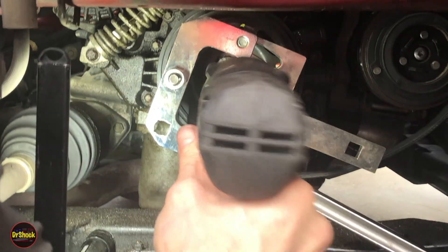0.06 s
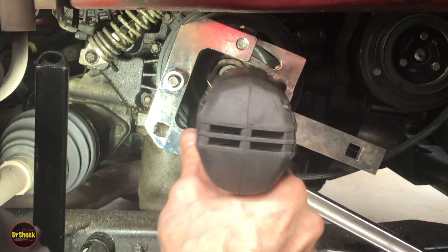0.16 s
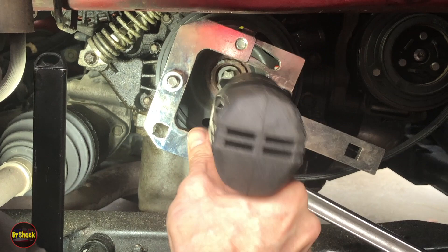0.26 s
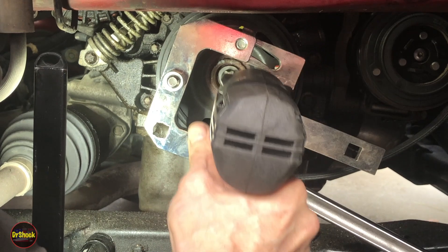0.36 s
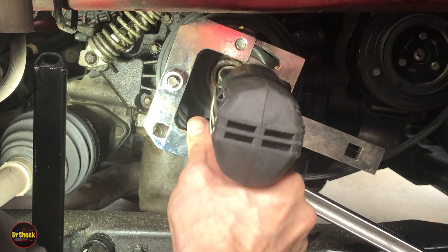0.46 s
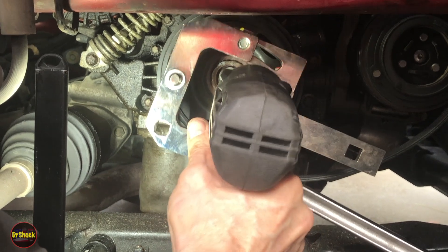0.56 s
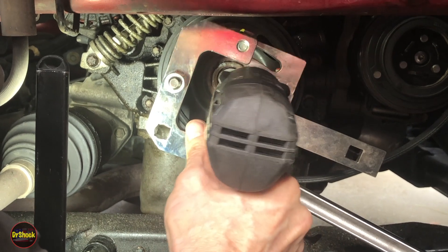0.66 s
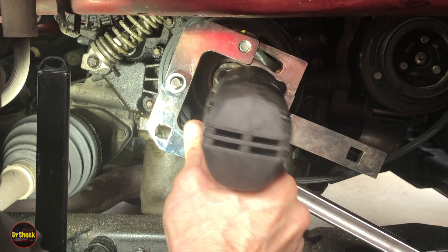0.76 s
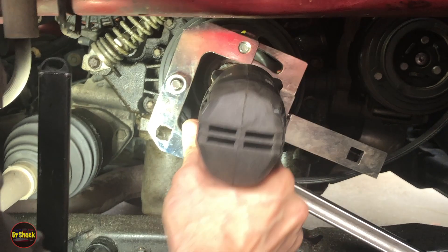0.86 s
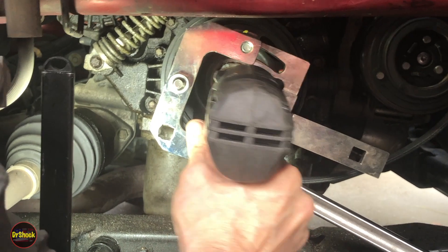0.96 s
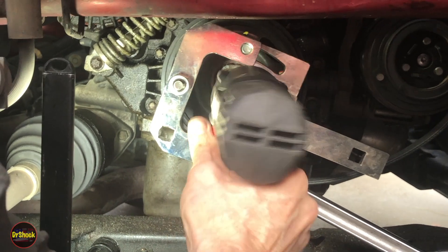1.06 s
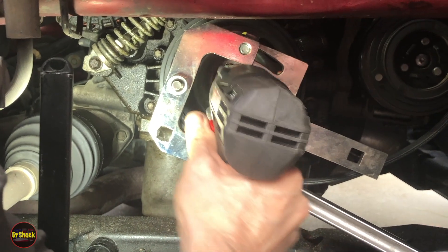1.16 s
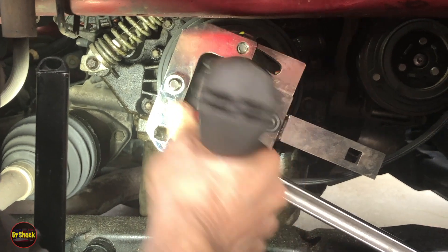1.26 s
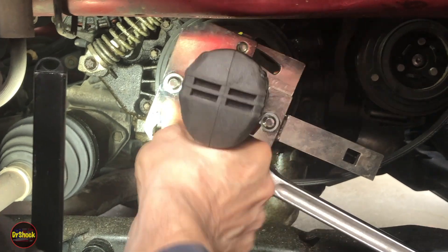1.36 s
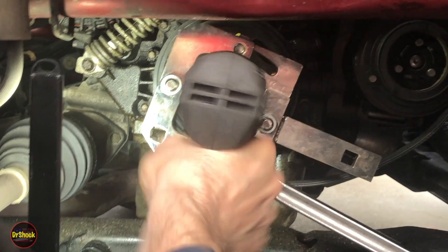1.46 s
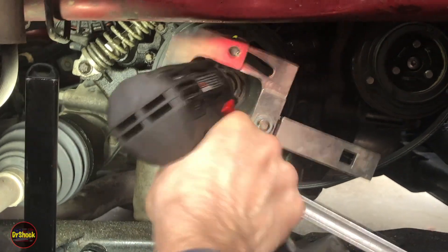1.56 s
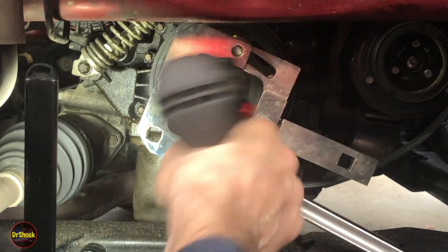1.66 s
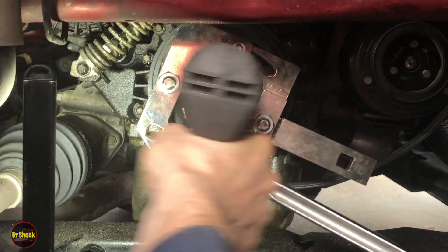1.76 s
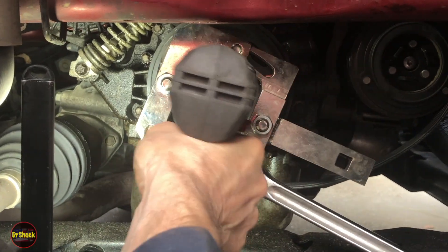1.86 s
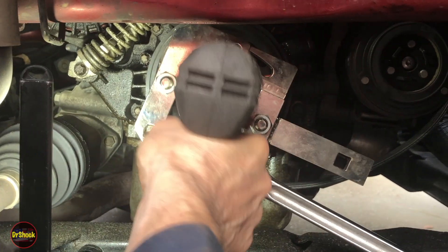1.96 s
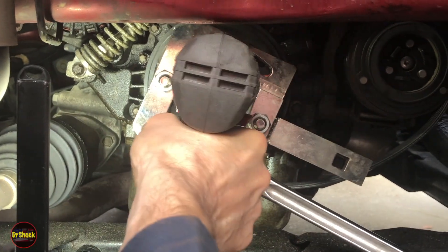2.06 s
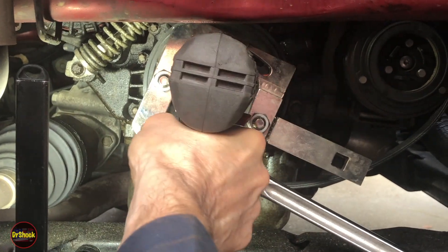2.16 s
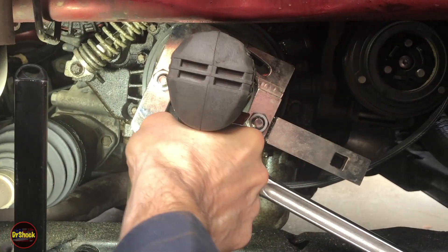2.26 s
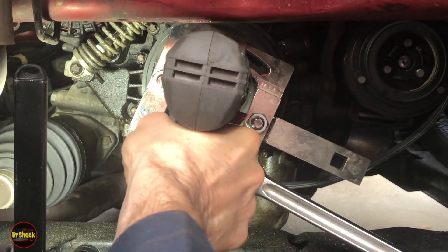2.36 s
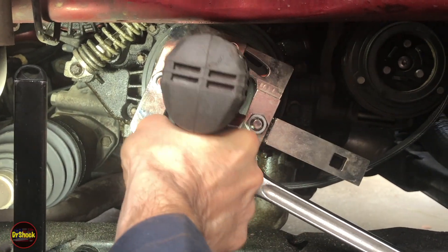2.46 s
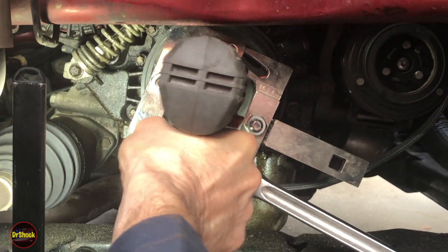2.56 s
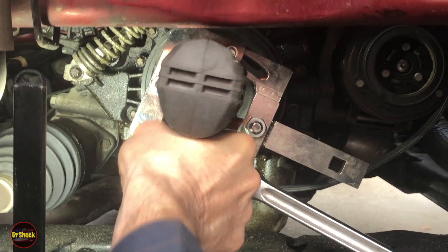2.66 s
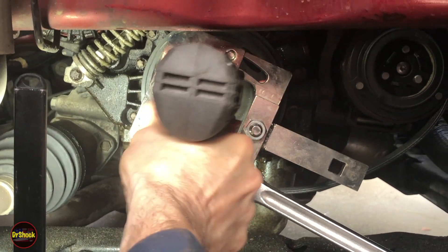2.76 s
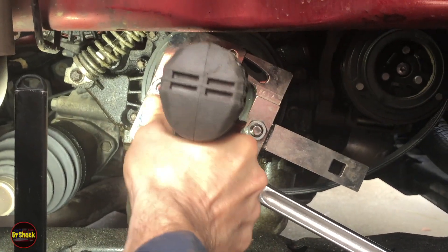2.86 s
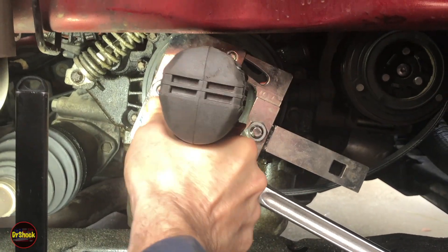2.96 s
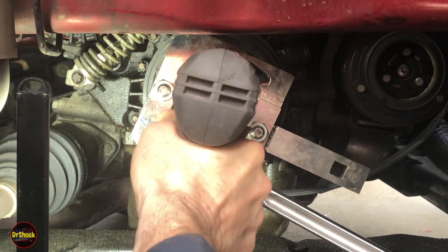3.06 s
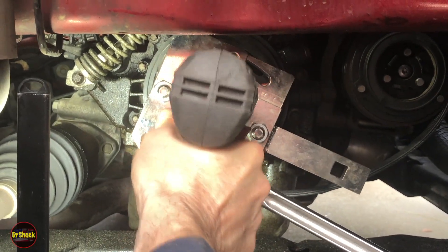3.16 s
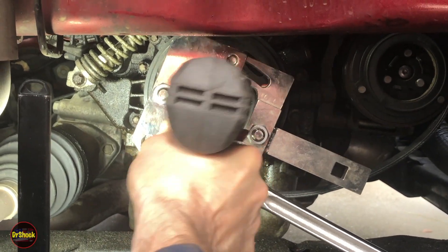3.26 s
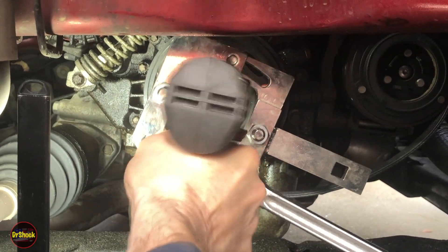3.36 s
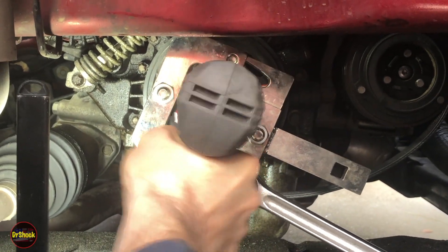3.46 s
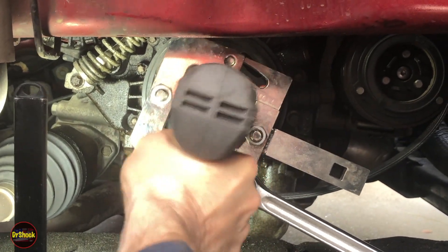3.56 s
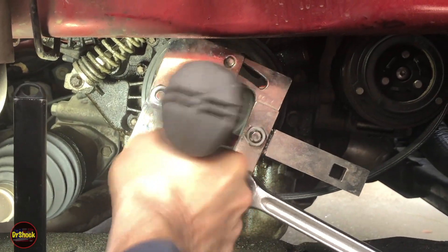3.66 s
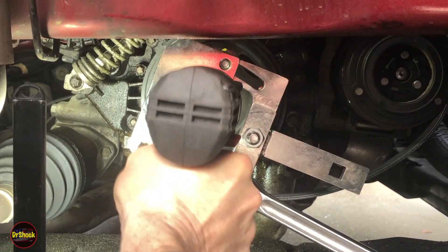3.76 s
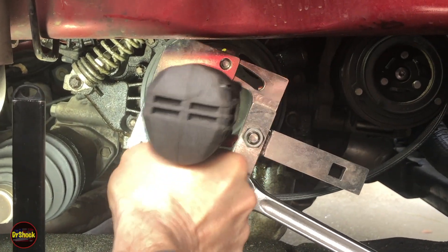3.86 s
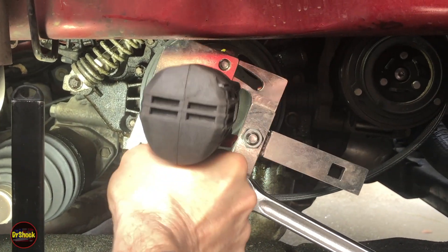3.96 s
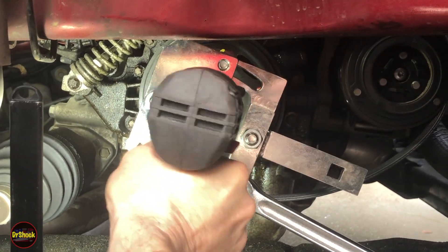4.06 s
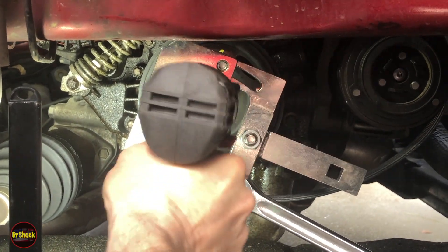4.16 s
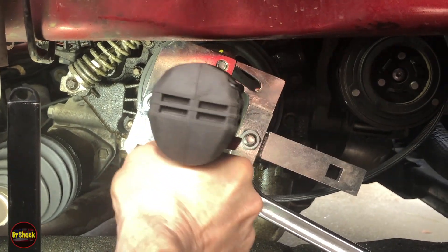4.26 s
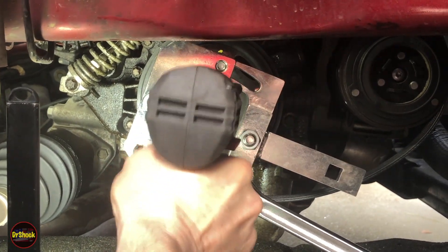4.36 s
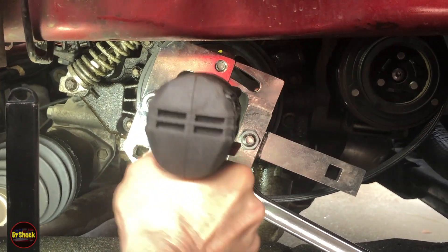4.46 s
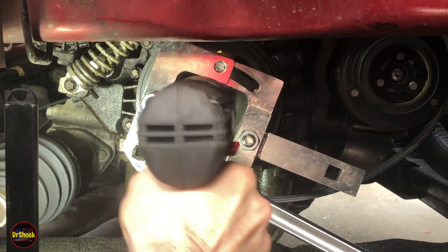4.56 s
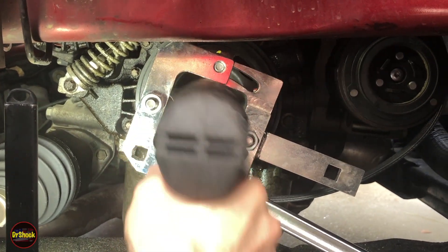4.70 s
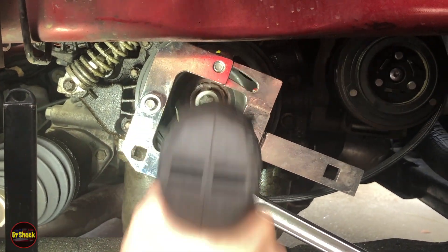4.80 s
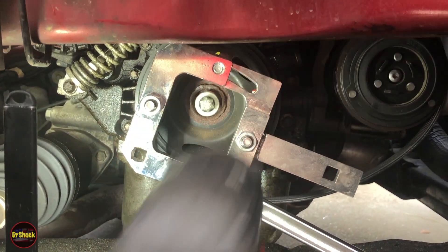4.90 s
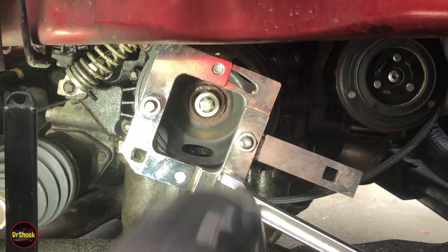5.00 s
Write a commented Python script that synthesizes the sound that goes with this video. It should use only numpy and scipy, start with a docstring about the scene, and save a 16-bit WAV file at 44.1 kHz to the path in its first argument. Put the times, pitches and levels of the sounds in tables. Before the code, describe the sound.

A close perspective in a quiet garage with soft steady air, short reflections from nearby metal and a faint room tail. From 0 to 0.7 s there is light rustling and a few faint socket taps. A sharp metal clack lands at 0.95 s, smaller knocks follow to 1.3 s, and a loud, dense clatter with dull ringing comes around 1.6 to 1.75 s. Then only faint ticks and handling, with a barely audible high electronic whistle near 2.55 s. At about 3.35 s a cordless impact wrench starts: from 3.4 to 3.65 s a dozen loud, rapid blows ring through steel. The bolt loosens, and the whine climbs over rattling gears until a sharp braking fall at 3.87 s with a faint clash. A second whirring pull runs from 4.0 to 4.5 s, rising quickly, holding, then braking with a bright clash. Soft rustling ends it at 5 s.

```python
"""A cordless impact wrench runs a bolt out of an engine, heard from close by in a garage.
The socket knocks and rustles about until it seats; each contact is a noise burst with a metal ring.
Twelve hammer blows, noise bursts ringing through steel, break the bolt loose. In two pulls of the
trigger the motor spins it out: sine tones make the whine, filtered noise the rattling gears.
A faint drive whistle, a clash near each release and quiet, steady air complete the scene."""
import sys
import numpy as np
from scipy import signal
from scipy.fft import rfft, irfft
from scipy.io import wavfile

SR = 44100
rng = np.random.default_rng(int(sys.argv[2]) if len(sys.argv) > 2 else 0)


def int16_out(signal):
    """Quantize to a 16-bit WAV file."""
    q = np.round(np.clip(np.atleast_2d(signal).T, -1, 1) * 32767)
    wavfile.write(sys.argv[1], SR, q.astype(np.int16))


N = 221965
TIME = np.arange(N) / SR  # seconds

# Socket and tool knocking on bolt and bracket. Each row: start in seconds, base level in dB,
# hardness in dB, centre of the ring in Hz, base level of the ring in dB against the knock.
KNOCKS = [(0.3073, -43, 1, 2140, -20), (0.362, -55, 3, 2230, -12), (0.5535, -56.5, -8, 1920, -2),
          (0.6488, -53, -3, 2210, -14), (0.95, -22, -1.5, 2650, -6.5), (1.1061, -37, 6.5, 1670, -7),
          (1.1484, -34, -5.5, 1640, -13), (1.1536, -27.5, 3.5, 1700, -11), (1.1798, -41, -12, 2360, -10),
          (1.1959, -32.5, -3, 1560, -12.5), (1.3122, -44.5, -11, 1170, -3), (1.5835, -30.5, 4, 1500, -3.5),
          (1.5896, -19.5, 2, 2560, -10), (1.6072, -13, -0.5, 1230, -7.5), (1.6304, -30, -1, 1040, -9),
          (1.664, -25.5, -0.5, 1250, -10), (1.712, -24.5, -2, 1490, -5.5), (1.7465, -40.5, -11, 1530, -4),
          (1.8232, -52, 1, 1790, -9), (1.993, -62, -23, 1042, -9), (2.2339, -56, -11, 1010, -8),
          (2.325, -62, -15, 1010, -1), (2.478, -54.5, 5, 1750, -8), (2.5261, -43.5, 11, 1530, -11),
          (2.649, -57.5, 3, 3900, -4), (2.7202, -49.5, 5, 1790, -8), (2.8282, -43, 6, 1410, -2),
          (2.8741, -51.5, 1, 1540, 1), (2.974, -53.5, 4, 2650, -12), (3.0837, -39.5, 17, 3190, -8),
          (3.3375, -50.5, -2, 4160, -1), (3.357, -52, 2, 4950, 2)]
# A light touch on the trigger first takes up the slack: start and end in seconds, whine pitch in Hz.
CREEP_START_S, CREEP_END_S, CREEP_HZ = 3.328, 3.39, 1950
BOLT_FREE_S = 3.672  # moment the bolt comes loose
BRAKE_S = 0.095  # from release to standstill
EASE_S = 0.02  # how gradually the finger and the brake act


def from_db(db):
    """Turn decibels into an amplitude factor."""
    return 10 ** (np.asarray(db) / 20)


def rms_one(x):
    """Scale a signal to an average (RMS) level of one."""
    return x / np.sqrt(np.mean(x ** 2) + 1e-20)


def noise():
    """White noise as long as the scene."""
    return rng.standard_normal(N)


def band(x, hz, kind, order=2):
    """Keep the low, high or middle part of the spectrum."""
    return signal.sosfilt(signal.butter(order, hz, kind, fs=SR, output="sos"), x)


def drift(hz):
    """Random wander of spread 1, mostly slower than the given rate."""
    return rms_one(band(noise(), hz, "low"))


def coloured(x, spectrum, size=8192):
    """Filter to the given spectrum without sounding early (minimum phase); white noise keeps its power."""
    hz, db = np.transpose(spectrum)
    bin_hz = np.arange(size // 2 + 1) * SR / size
    gain = from_db(np.interp(np.log(bin_hz + 1), np.log(hz), db))
    # Folding the cepstrum puts the filter's energy as early as possible.
    cepstrum = irfft(np.log(rms_one(gain)))
    cepstrum[1:size // 2] *= 2
    cepstrum[size // 2 + 1:] = 0
    impulse = irfft(np.exp(rfft(cepstrum)))
    return signal.fftconvolve(x, impulse)[:N]


def steel(x, width_hz):
    """The steel parts ring in parallel; the tighter they are held, the wider their modes."""
    # Ring of socket, bolt and bracket. Each row: pitch in Hz, relative level in dB.
    steel_modes = [(1499, 2.5), (1604, -2), (1784, 4.5), (1951, -2), (2368, 1.5), (2629, -1), (2847, 6),
                   (2998, -7), (3081, -5), (3186, -10), (3278, -6.5), (3442, -11.5), (3644, -2),
                   (3752, -6.5), (4190, -8.5), (4403, -9.5), (4551, -5.5), (5477, -5)]
    out = np.zeros(N)
    r = np.exp(-np.pi * width_hz / SR)  # a wider mode dies away faster
    for k, (hz, db) in enumerate(steel_modes):
        feedback = [1, -2 * r * np.cos(2 * np.pi * hz / SR), r * r]
        ring = signal.lfilter([1 - r, 0, r - 1], feedback, x)
        out += (-1) ** k * from_db(db) * ring
    return out


def bursts(times, levels_db, t60, tail_db, tail_t60):
    """Each contact is a crack that scatters through the metal; t60 is the seconds it takes to fall 60 dB."""
    power = np.zeros(N)
    power[np.round(np.asarray(times) * SR).astype(int)] = from_db(levels_db) ** 2

    def fading(seconds):
        """Power dying away steadily after each contact."""
        kept_per_sample = from_db(-60 / (seconds * SR)) ** 2
        return signal.lfilter([1], [1, -kept_per_sample], power + 1e-18)

    return noise() * np.sqrt(fading(t60) + from_db(tail_db) ** 2 * fading(tail_t60))


def still_air():
    """The still air of the garage: steady coloured noise."""
    # Each row: frequency in Hz, relative level per hertz in dB.
    air_colour = [(12, -43), (20, -10), (74, -3), (137, -4.5), (317, -20.5), (524, -21), (843, -22.5),
                  (996, -28.5), (1690, -31), (1950, -38), (3040, -34), (3400, -36), (15800, -45.5)]
    return from_db(-61) * coloured(noise(), air_colour)


def rustle():
    """Hand, sleeve and socket slide as the tool is brought up and drawn away; each move swells and fades."""
    # Each row: frequency in Hz, relative level per hertz in dB.
    rustle_colour = [(120, -36.5), (200, 3.5), (268, -1), (537, -5.5), (848, -12), (1790, -10.5),
                     (5370, -21), (11200, -28), (15800, -31)]
    # Each row: middle in seconds, half-length in seconds, base level in dB, adjustment of the hiss in dB.
    moves = [(0.01, 0.05, -68.5, 9), (0.22, 0.16, -67.5, 0.5), (0.96, 0.089, -62.5, -22),
             (1.416, 0.056, -65, 1), (1.64, 0.13, -52, -14), (2.062, 0.089, -73, -1),
             (2.524, 0.04, -70, 4.5), (2.754, 0.044, -66.5, -7), (3.36, 0.06, -62.5, -21),
             (4.976, 0.16, -58, -12)]
    grain = coloured(noise() * from_db(2.4 * drift(60)), rustle_colour)
    low = band(grain, [250, 5000], "band")
    high = from_db(10.5) * band(grain, 4000, "high", order=1)
    out = np.zeros(N)
    for s, half, db, hiss_db in moves:
        swell = np.exp(-((TIME - s) / half) ** 2)
        out += from_db(db) * swell * (low + from_db(hiss_db) * high)
    return out


def knocks():
    """Light metal contacts: a rattling clack, a longer thud of the bracket, a short bright tick and a clink."""
    # Each row: frequency in Hz, relative level per hertz in dB.
    knock_colour = [(59, -31.5), (100, -10.5), (396, -12), (511, -0.5), (717, -11.5), (868, -8),
                    (1410, -13), (1540, -6), (1940, -6), (7370, -23), (9300, -23.5), (15800, -34)]
    thud_base_db, tick_base_db = -18, -19.5  # against the clack, before the mix below
    s, db, hard_db = np.vstack([[row[:3] for row in KNOCKS], fidgets()]).T
    # A harder contact has more tick and less thud.
    contacts = np.column_stack([s, db, db + thud_base_db - hard_db, db + tick_base_db + hard_db])
    s, db, thud_db, tick_db = bouncing(contacts, bounce_db=-7.5, spread=0.006).T
    clack = bursts(s, db, t60=0.027, tail_db=-14.0, tail_t60=0.1) * from_db(0.42 * drift(340))
    thud = bursts(s, thud_db, t60=0.074, tail_db=-10.5, tail_t60=0.19)
    tick = bursts(s, tick_db, t60=0.037, tail_db=-18.5, tail_t60=0.07)
    contact = from_db(-5.5) * band(clack, [800, 7000], "band")
    contact += from_db(7.5) * band(thud, 700, "low")
    contact += from_db(12.0) * band(tick, 3700, "high")
    ring = from_db(-12.5) * steel(clack, width_hz=45)
    return coloured(contact, knock_colour) + ring + clinks(t60=0.036, breadth=0.22)


def fidgets(count=40):
    """Faint touches at random while the socket hunts for the bolt, until the motor starts."""
    per_second, middle_db, spread_db = 2.3, -64.5, 3.5
    wait, size, hardness = rng.random((count, 3)).T
    s = np.cumsum(-np.log(1 - wait) / per_second)  # random waits between touches
    level_db = middle_db + spread_db * (2 * size - 1)
    hard_db = 6 * (2 * hardness - 1)
    return np.column_stack([s, level_db, hard_db])[s < CREEP_START_S]


def bouncing(rows, bounce_db, spread, count=2):
    """Loose parts touch again, more weakly, just after each contact."""
    rows = np.array(rows, float)
    gaps = 0.0014 + spread * rng.random((len(rows), count))  # seconds
    delays = gaps.cumsum(axis=1)
    touches = [rows]
    for k in range(count):
        touches.append(np.column_stack([rows[:, 0] + delays[:, k], rows[:, 1:] + (k + 1) * bounce_db]))
    return np.vstack(touches)


def clinks(t60, breadth):
    """Each listed knock favours a cluster of modes around a pitch of its own."""
    out = np.zeros(N)
    age = TIME[:SR // 8]  # seconds since the contact
    ratio = 1 + breadth
    for s, db, _, hz, ring_db in KNOCKS:
        at = round(s * SR)
        cluster = rms_one(band(rng.standard_normal(len(age)), [hz / ratio, hz * ratio], "band"))
        out[at:at + len(age)] += from_db(db + ring_db - 60 * age / t60) * cluster
    return out


def whistle():
    """With the trigger barely pressed, the windings sing at the drive's switching rate before the rotor turns."""
    # Each row: time in seconds, level in dB.
    whistle_curve = [(2.52, -73), (2.57, -70), (2.655, -78)]
    s, db = np.transpose(whistle_curve)
    fade = 0.004  # seconds
    gate = np.interp(TIME, [s[0] - fade, s[0], s[-1], s[-1] + fade], [0, 1, 1, 0])
    phase = 2 * np.pi * 7402 * TIME
    tone = np.sin(phase) + from_db(-16) * np.sin(2 * phase)
    return gate * from_db(np.interp(TIME, s, db)) * np.sqrt(2) * tone


def motor():
    """Gear teeth chatter in step with the turning hammer under the rotor's whine; speed and load set the level."""
    # Pulls of the trigger. Each row: pressed in seconds, released in seconds,
    # free-running speed given as whine pitch in Hz.
    pulls = [(3.375, 3.866, 3750), (3.996, 4.501, 3925)]
    # Each row: frequency in Hz, relative level per hertz in dB.
    gear_colour = [(35, -48), (60, -21.5), (156, -15), (370, -18.5), (537, -9.5), (745, -15), (817, -12),
                   (1130, -10), (1760, -3), (2750, -6), (3720, -7), (4490, -8.5), (5930, -16.5),
                   (10900, -12.5), (15800, -24)]
    full_speed_hz = 3925  # whine pitch that counts as speed 1
    gears_db, treble_db, whine_db = -30, -2.5, -1.5  # base levels; the last two ride on the first
    gears_power, treble_power = 0.8, 0.8  # each grows as this power of the speed
    drag_db, drag_s = 1, 0.22  # the thread loads the gears, less and less as the bolt runs out
    brake_load_db, brake_whine_db = 2.5, -9  # the brake loads the gears too and stifles the whine
    # Below this whine pitch the teeth stop chattering and only roll quietly.
    lash_hz, lash_steepness, rolling_db = 1150, 5, -18

    creep = (CREEP_START_S, CREEP_END_S, CREEP_HZ)
    pitch = np.max([pull(*row) for row in pulls + [creep]], axis=0)
    speed = pitch / full_speed_hz + 1e-9
    braked = np.zeros(N)
    for _, released, _ in pulls:
        braked += np.interp(TIME - released, [0, EASE_S, BRAKE_S, BRAKE_S + EASE_S], [0, 1, 1, 0])
    drag = drag_db * np.exp(-np.maximum(TIME - BOLT_FREE_S, 0) / drag_s)
    load_db = drag + brake_load_db * braked

    cycles = np.cumsum(pitch * (1 + 0.002 * drift(90))) / SR
    turning = 2 * np.pi * cycles / 37  # the hammer turns once in 37 whine cycles
    chatter = noise() * from_db(1.0 * np.cos(turning) + 1.2 * drift(130))
    rattle = coloured(chatter, gear_colour) + from_db(-4.0) * steel(chatter, width_hz=30)
    body = from_db(0.5) * band(rattle, 5500, "low")
    treble = from_db(treble_db) * speed ** treble_power * band(rattle, 5700, "high")
    tone = from_db(whine_db + brake_whine_db * braked) * whine(pitch, cycles)

    lash = (pitch / lash_hz) ** lash_steepness
    chattering = lash / (1 + lash) + from_db(rolling_db)
    level = from_db(gears_db + load_db) * speed ** gears_power * chattering
    return level * (body - treble + tone)


def pull(pressed, released, free_hz):
    """The motor spins up, is held back until the bolt comes free, sags as the finger eases and is braked."""
    spin_up_s, hammering_hz = 0.072, 2700  # the whine stays below this pitch until the bolt is free
    ease_share = 0.05  # share of the speed lost as the finger eases
    brake_curve = 1.4  # the brake weakens as the motor slows

    def lag(since):
        """Share of a speed change still to come."""
        return np.exp(-np.maximum(TIME - since, 0) / spin_up_s)

    spinning_up = free_hz * (1 - lag(pressed))
    held_back = free_hz - (free_hz - hammering_hz) * lag(BOLT_FREE_S)
    easing = 1 - ease_share * np.exp(np.minimum(TIME - released, 0) / EASE_S)
    slowing = np.clip(1 - (TIME - released) / BRAKE_S, 0, 1) ** brake_curve
    return np.minimum(spinning_up, held_back) * easing * slowing


def whine(pitch, cycles):
    """Orders of the rotor and gears flutter, and swell as they sweep through the housing's resonance."""
    # Each row: multiple of the whine pitch, base level in dB.
    orders = [(0.515, -7), (0.585, -13), (0.66, -17), (1.0, 0), (1.55, -24), (2.0, -19), (2.04, -20),
              (2.667, -25)]
    housing_hz, housing_width_hz, housing_db = 5100, 450, 10
    # Speeding up presses the gear teeth together, which brings out the side orders.
    side_db = 8 * np.clip(np.gradient(pitch) * SR / 20000, 0, 1)
    out = np.zeros(N)
    for multiple, db in orders:
        swell_db = housing_db * np.exp(-((multiple * pitch - housing_hz) / housing_width_hz) ** 2)
        flutter_db = 2.6 * drift(45)
        level = from_db(db + swell_db + flutter_db + side_db * (multiple != 1))
        out += level * np.sin(2 * np.pi * multiple * cycles)
    return band(out, 1400, "high")  # the small housing radiates low tones poorly


def hammer():
    """Bright blows of hammer on anvil, with duller rebounds leading into each one."""
    # Each row: start in seconds, base level in dB, base level in dB of the rebounds that lead into it.
    blow_rows = [(3.4092, -3, 3), (3.434, -1, 4), (3.4576, -2.5, -12.5), (3.479, 0, -7), (3.5, -3, -2.5),
                 (3.5178, 0.5, 0.5), (3.5381, 0, -2), (3.5594, -2, -5.5), (3.5817, -2, -2),
                 (3.6033, -5.5, -0.5), (3.6229, -2.5, -1), (3.6425, -4.5, 5.5)]
    # Each row: frequency in Hz, relative level per hertz in dB.
    blow_colour = [(15, -42.5), (25, -10), (72, -3.5), (161, -9.5), (241, -7.5), (361, -16), (500, -5),
                   (1150, -8), (1590, -1.5), (2810, -2.5), (3390, -7), (3680, -2.5), (6310, -12),
                   (11100, -11), (15800, -22)]
    # The hammer skips over its cam twice, this many seconds ahead of each blow.
    rebound_leads = [0.007, 0.004]
    # It only grazes the anvil as it starts and stops striking. Each row: start in seconds, base level in dB.
    grazes = [(3.3936, -0.5), (3.66, -5.5), (3.6707, -8)]
    s, db, _ = np.transpose(blow_rows)
    blows = from_db(4.5) * bursts(s, db, t60=0.04, tail_db=-13.5, tail_t60=0.15)
    rebound_rows = [(at - lead, db) for at, _, db in blow_rows for lead in rebound_leads]
    s, db = np.transpose(rebound_rows + grazes)
    rebounds = from_db(-3.5) * bursts(s, db, t60=0.016, tail_db=-22, tail_t60=0.07)
    bright = from_db(0.5) * coloured(blows, blow_colour)
    dull = from_db(6.0) * band(steel(rebounds, width_hz=97), 3200, "low")
    ring = from_db(-0.5) * steel(blows + rebounds, width_hz=26)
    return bright + dull + ring


def braking():
    """The drive train clashes brightly as the brake bites, close to each release of a pull."""
    # Each row: start in seconds, base level in dB.
    clashes = [(3.8737, -19), (4.5003, -15)]
    s, db = np.transpose(clashes)
    clash = bursts(s, db, t60=0.076, tail_db=-23.5, tail_t60=0.22)
    return band(clash, [4800, 12000], "band") + from_db(-6) * band(clash, [1500, 6000], "band")


def garage(x, near_db, near_t60, far_db, far_t60):
    """Quick reflections from the wheel well and a faint, dull, longer tail from the room."""

    def tail(t60):
        """Dying noise that starts 2 ms after the direct sound."""
        fading_noise = noise() * from_db(-60 * TIME / t60) * (TIME > 0.002)
        return rms_one(fading_noise) / np.sqrt(N)  # total energy of one

    near = from_db(near_db) * tail(near_t60)
    far = from_db(far_db) * band(tail(far_t60), 4300, "low")
    return x + signal.fftconvolve(x, near + far)[:N]


def scene():
    """The tool and its knocks in the garage, with the whistle, the handling and the still air added."""
    dry_tool = knocks() + motor() + hammer() + braking()
    tool = garage(dry_tool, near_db=-13.0, near_t60=0.067, far_db=-23.0, far_t60=0.29)
    return (still_air() + rustle() + whistle() + tool)[None]


def record(dry, top=0.54):
    """Squash the loudest peaks smoothly, then cut steeply above 15950 Hz."""
    squashed = top * np.tanh(dry / top)
    return signal.sosfilt(signal.ellip(12, 0.1, 80, 15950, fs=SR, output="sos"), squashed)


dry = scene()
out = record(dry)
int16_out(out)
```